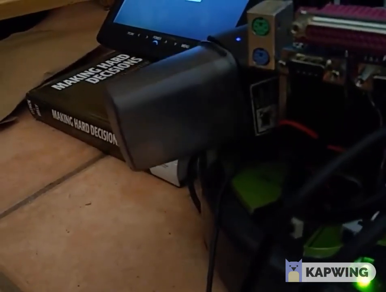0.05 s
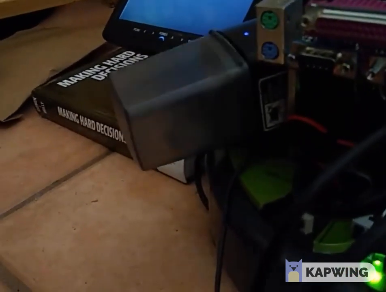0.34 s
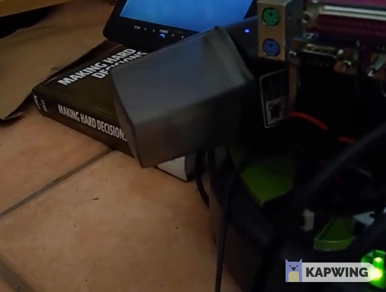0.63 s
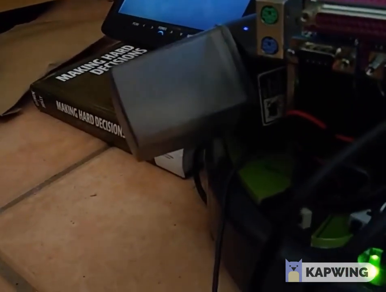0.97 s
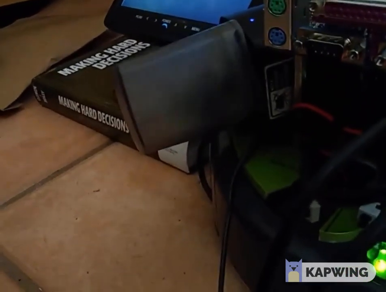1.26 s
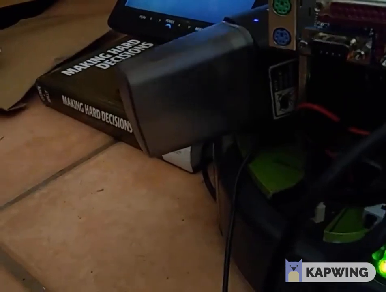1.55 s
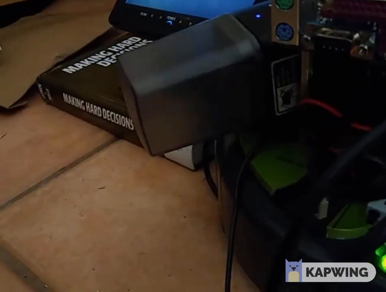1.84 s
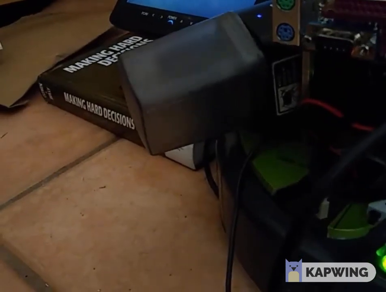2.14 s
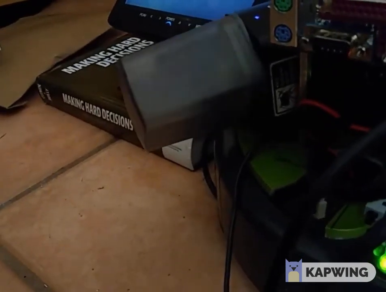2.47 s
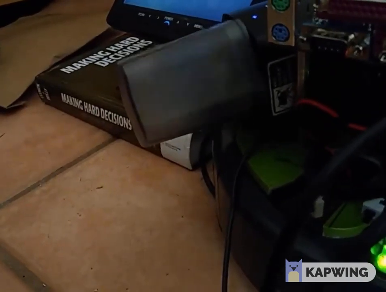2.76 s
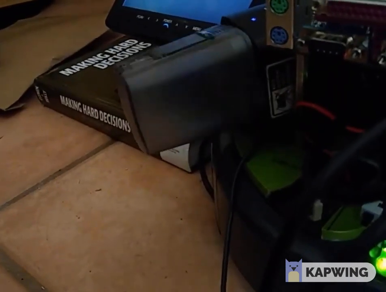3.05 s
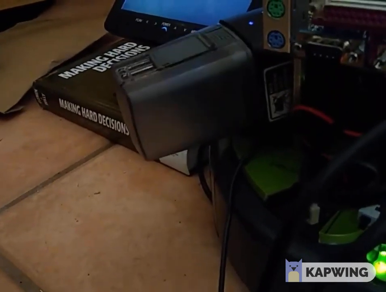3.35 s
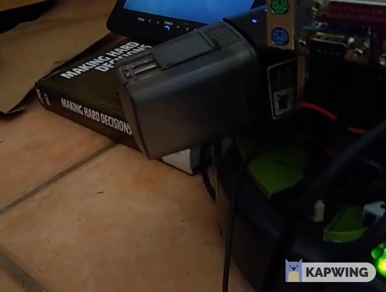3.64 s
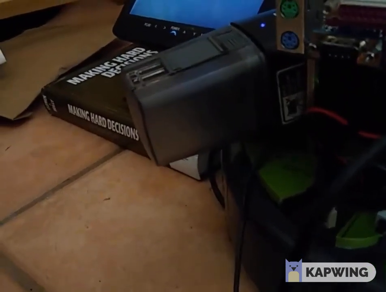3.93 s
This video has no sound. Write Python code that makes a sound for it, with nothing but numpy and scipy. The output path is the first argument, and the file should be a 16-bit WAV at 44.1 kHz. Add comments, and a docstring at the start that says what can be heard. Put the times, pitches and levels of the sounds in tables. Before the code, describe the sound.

A small geared motor whirrs and rasps, turning a plastic container, then snaps and stops.

```python
"""A small geared motor turns a plastic treat container in a quiet room. From the start its gearbox
whirrs and rasps over one rough stretch of a gear four times a second, while treats tumble against
the container wall. From 1.4 to 2.6 s the load slows the motor, the gears grind harder and the
container drones. At 3.33 s plastic snaps sharply and the power cuts; the motor coasts to rest by
3.7 s under a few last rattles, leaving faint hiss and a thin whistle."""
import sys
import numpy as np
from scipy import signal
from scipy.fft import rfft, irfft
from scipy.io import wavfile

SR = 44100
rng = np.random.default_rng(int(sys.argv[2]) if len(sys.argv) > 2 else 0)


def put_to_file(sound):
    """Save the sound as 16-bit audio at rate SR, in the file named by the first command-line argument."""
    columns = np.atleast_2d(sound).T  # one column per channel
    safe = np.clip(columns, -1, 1)
    whole_steps = np.round(safe * 32767)
    wavfile.write(sys.argv[1], SR, whole_steps.astype(np.int16))


N = 176400
FILTER_SIZE = 8192
TURNS_PER_REV = 24  # motor turns per gear revolution

# Each row: time in seconds, nominal motor speed in turns per second.
MOTOR_SPEED = [(0, 95.88), (0.38, 96.8), (0.52, 95.59), (0.68, 98.09), (1.33, 98.2), (1.62, 93.68),
               (1.97, 89.34), (2.12, 92.45), (2.45, 91.66), (2.7, 96.22), (3.02, 96.83), (3.2, 98.68),
               (3.33, 100.44), (3.39, 76), (3.46, 60), (3.62, 42), (3.69, 0)]
# Each row: time in seconds, load on the drive from 0 to 1.
DRIVE_LOAD = [(1.37, 0), (1.48, 1), (2.53, 1), (2.62, .2), (3.3, 0)]
def drive():
    """Motor speed, turns made and load; the turning sags slightly once per gear revolution."""
    speed = curve(MOTOR_SPEED)
    turns = np.cumsum(speed) / SR
    sag_turns = .03 * np.sin(2 * np.pi * turns / TURNS_PER_REV)
    return speed, turns - sag_turns, np.clip(curve(DRIVE_LOAD), 0, 1)


def gearbox(speed, turns, load):
    """Gears and motor, louder with speed. Load deepens the grinding and stops the chatter."""
    full_speed_hz, db_per_decade, load_db, power_off_s = 96, 47.5, 3.5, 3.33
    grinding = amp(load_db * load) * (rasp(turns, load) + catching_teeth(turns, load))
    chatter = (1 - load) * slack_gears(turns)
    powered = np.arange(N) / SR < power_off_s
    motor = motor_whine(turns) + powered * motor_lines(turns)
    return (grinding + chatter + motor) * amp(db_per_decade * np.log10(speed / full_speed_hz + 1e-6))


# Each row: place on the gear in motor turns, relative scraping level in dB.
GEAR_ROUGHNESS = [(.3, 0.5), (3.3, -4.5), (4.6, -14), (7, -15), (9.6, -15.5), (10.4, -10), (12, -15),
                  (15.6, -13), (16.2, -8), (17.8, -5.5), (19.8, -11), (20.9, -11), (22.4, -1.5)]
# Each row: frequency in Hz, gain in dB.
RASP_SPECTRUM = [(300, -31), (900, -10), (1800, 0), (2600, 1.5), (3600, 2.5), (6000, -1.5), (9000, -0.5),
                 (15000, -7)]
def rasp(turns, load):
    """Fine scraping that swells as the rough stretch of the gear comes round."""
    level_db = np.interp(turns, *np.transpose(GEAR_ROUGHNESS), period=TURNS_PER_REV)
    flutter_db = 1.5 * wobble(70)
    scraping = ticks(rate_hz=1500) * amp(level_db + flutter_db - 34)
    return housing(scraping, RASP_SPECTRUM, load)


# Each row: place on the gear in motor turns, relative level in dB.
TOOTH_CATCHES = [(.3, 2.5), (1.27, 1), (1.55, -4.5), (2.28, 0), (3.23, 1.5), (10.05, -7.5), (16.6, -10.5),
                 (17.25, -3), (18.2, -15.5), (18.65, -12.5), (21, -3.5), (21.65, -8.5), (22.28, 3),
                 (22.6, -2), (23.6, -3.5)]
# Each row: frequency in Hz, gain in dB.
TOOTH_SPECTRUM = [(300, -43.5), (1500, -10), (3500, -8.5), (5800, 6), (8000, -8), (15000, -13.5)]
def catching_teeth(turns, load):
    """The same teeth catch on every revolution and click through the housing."""
    return amp(-12) * housing(contacts(turns, TOOTH_CATCHES, scatter_db=1.75), TOOTH_SPECTRUM, load)


# Each row: frequency in Hz, width in Hz, unloaded gain in dB, loaded gain in dB.
HOUSING_MODES = [(1410, 150, -21, -7.5), (1810, 51, -5, -11.5), (2206, 110, -12.5, -7.5),
                 (2287, 800, -9, -8), (2770, 33, -15, -7.5), (3346, 47, 4.5, -9.5), (3650, 207, -5.5, 5.5),
                 (4630, 130, -11.5, -2), (5240, 62, -8.5, -11.5), (5710, 310, -10, 3.5),
                 (5820, 170, -2.5, -14), (6187, 330, -5, -1.5), (6640, 115, 0, 4.5), (7510, 270, -3, -3)]
# Each row: frequency in Hz, gain of the broad response under the modes in dB.
HOUSING_BROADBAND = [(200, -50), (500, -17), (1000, -21), (1180, -14.5), (2400, -9.5), (4300, -9.5),
                     (7000, -10), (8000, -10.5), (8700, -20), (10500, -18.5), (11700, -28), (13500, -23),
                     (15500, -37)]
def housing(force, spectrum, load):
    """The gearbox housing rings differently when the load presses on it."""
    hz, width_hz, light_db, heavy_db = np.transpose(HOUSING_MODES)
    colour, bed = gains(spectrum), gains(HOUSING_BROADBAND)
    light, heavy = [ring(force, colour * np.hypot(resonances(zip(hz, width_hz, db)), bed))
                    for db in (light_db, heavy_db)]
    return light * (1 - load) + heavy * load


# Each row: place on the gear in motor turns, relative levels of the low and the high ring in dB.
SLACK_HITS = [(0.8015, 2.5, -10.5), (1.85, -1, -11.5), (2.45, -14, -0.5), (3.476, -9.5, 5), (6.97, -1, 1.5),
              (10, -1.5, -12), (10.24, -10.5, 2.5), (10.71, -18, -0.5), (10.97, -4, 3.5), (11.9, -8, -8.5),
              (16.12, -8, 1), (16.62, 1.5, -15.5), (17.46, -4, 1), (17.93, -2, -2.5), (19.66, -1.5, -8),
              (20.43, -7, -20), (21.3, -9, 2.5), (22.5, 3.5, -7), (23.94, 2.5, -11)]
# Each row: frequency in Hz, width in Hz, gain in dB.
SLACK_MODES = [(2499, 144, -4), (3478, 120, -3.5)]
def slack_gears(turns):
    """Two loose gears chatter, each ringing at its own pitch."""
    place, *levels_db = np.transpose(SLACK_HITS)
    chatter = np.zeros(N)
    for hit_db, (hz, width_hz, db) in zip(levels_db, SLACK_MODES):
        hits = contacts(turns, np.c_[place, hit_db], scatter_db=1.5)
        chatter += amp(db) * ring(hits, resonances([(hz, width_hz, 0)]) * low_cut(hz=2044, order=2))
    return amp(-15) * chatter


# Each row: frequency in Hz, gain in dB.
WHINE_SPECTRUM = [(250, -52.5), (740, -27), (870, -6.5), (1020, -34), (1200, -2.5), (1550, -2.5),
                  (2500, -6.5), (3400, 0), (4500, -2.5), (6400, -5.5), (7000, -3), (7550, 7), (8600, -8.5),
                  (15000, -21)]
def motor_whine(turns):
    """A dense, slightly jittery stack of harmonics of the motor speed."""
    jitter_turns = .012 * wobble(110)
    return amp(-49.5) * unit(ring(buzz(turns + jitter_turns, harmonics=160), gains(WHINE_SPECTRUM)))


# Each row: multiple of the motor speed, relative level in dB.
MOTOR_ORDERS = [(12, -63.5), (13, -70), (14, -70.5), (20, -59), (25, -68.5), (26, -57.5)]
def motor_lines(turns):
    """A few harmonics stand out, wavering in level and pitch."""
    return sum(amp(db + 3.8 * wobble(14)) * np.sin(2 * np.pi * order * (turns + .0063 * wobble(35)))
               for order, db in MOTOR_ORDERS)


# Each row: frequency in Hz, width in Hz, gain in dB.
WALL_MODES = [(308, 23, -9.5), (365, 28, -12), (445, 14, -13.5), (564.9, 10.8, 6), (610.7, 42, 2),
              (859, 64, -5)]
def container(turns, load):
    """Treats knock on the wall; under load they slide along it and the motor makes it drone."""
    high_cut = 1 / np.hypot(1, (grid() / 1200) ** 2)
    wall = resonances(WALL_MODES) * low_cut(hz=270, order=5) * high_cut
    sliding = amp(-61 + wobble(30)) * load
    treats = ring((amp(-4) * tumbles() + sliding) * rng.standard_normal(N), wall)
    drone = amp(-61.5) * load ** 2 * unit(ring(buzz(turns, harmonics=7), wall))
    return treats + drone


# Each row: start in seconds, relative level in dB.
TREAT_LANDINGS = [(0.004, -48.5), (0.19, -52.5), (0.22, -45.5), (0.273, -60), (0.416, -58), (0.436, -51),
                  (0.464, -43), (0.507, -49.5), (0.633, -49), (0.716, -40), (0.915, -48.5), (0.947, -54.5),
                  (0.975, -45), (1.017, -51.5), (1.051, -52.5), (1.109, -48), (1.152, -50.5), (1.203, -48),
                  (1.305, -54), (1.389, -50), (1.435, -49), (1.484, -44.5), (2.148, -47.5), (2.404, -48.5),
                  (2.707, -55), (2.746, -48), (2.851, -59), (2.888, -60.5), (2.951, -56), (2.996, -58),
                  (3.069, -54.5), (3.139, -55.5), (3.246, -49.5), (3.281, -45.5), (3.559, -79)]
def tumbles():
    """Envelope of the treats landing: a soft rise and a quick fade each."""
    attack_s, t60_s = .0087, .13
    t, envelope = np.arange(SR // 2) / SR, np.zeros(N + SR)
    landing = amp(-60 * t / t60_s) * np.minimum(t / attack_s, 1)
    for start_s, db in TREAT_LANDINGS:
        envelope[round(start_s * SR):][:len(t)] += amp(db) * landing
    return envelope[:N]


# Each row: start in seconds, relative level in dB.
CLICK_HITS = [(3.2496, -29), (3.3312, -6), (3.3555, -34.5), (3.529, -31), (3.577, -38.5), (3.641, -43),
              (3.8606, -58)]
# Each row: frequency in Hz, gain in dB.
CLICK_SPECTRUM = [(180, -78), (300, -40.5), (1190, -27), (1520, -7.5), (2020, 4), (2770, 2.5), (3670, -15),
                  (5380, -0.5), (9290, -3), (11700, -14.5), (15000, -16.5), (15800, -35)]
def clicks():
    """Sharp clicks: the hard plastic snap at 3.33 s and a few gear teeth knocking as the motor runs down, each
    an impulse with a very short tail."""
    blows = np.zeros(N)
    for start_s, db in CLICK_HITS:
        blows[round(start_s * SR)] += amp(db)
    tails = spread(blows, t60_s=.024, channels=1)[0]
    return ring(1.2 * blows + 1.25 * tails, gains(CLICK_SPECTRUM))


# Each row: start in seconds, level in dB, length in seconds.
RATTLE_BURSTS = [(0.679, -50, 0.025), (2.943, -51, 0.018), (3.003, -48, 0.029), (3.184, -43.5, 0.041),
                 (3.458, -46, .03), (3.494, -50.5, 0.034), (3.575, -47, 0.011), (3.6, -50, 0.015),
                 (3.642, -54, 0.019)]
# Each row: frequency in Hz, gain in dB.
RATTLE_SPECTRUM = [(700, -45), (1150, -36.5), (1350, -7.5), (1600, -17), (1950, -1), (2350, 2.5),
                   (2900, -8), (3200, -3.5), (4100, -13.5), (5400, -9), (8000, -15.5), (11000, -41)]
def rattles():
    """Short bursts of dry treats skittering over the plastic."""
    attack_s, release_s = .0016, .0053
    t, envelope = np.arange(N) / SR, np.zeros(N)
    for start_s, db, length_s in RATTLE_BURSTS:
        rise = np.clip((t - start_s) / attack_s, 0, 1)
        fade = np.exp(-np.maximum(t - start_s - length_s, 0) / release_s)
        envelope += amp(db) * rise * fade
    return ring(envelope * ticks(rate_hz=830), gains(RATTLE_SPECTRUM))


# Each row: frequency in Hz, gain in dB.
HISS_SPECTRUM = [(30, -14.5), (97, -2.5), (250, -17), (5380, -14.5), (12000, -9), (15600, -43.5),
                 (22000, -120)]
def room_tone():
    """Faint hiss and a thin high whistle."""
    whistle_hz, width_hz = 13200, 110
    hiss = np.array([ring(noise, gains(HISS_SPECTRUM)) for noise in rng.standard_normal((2, N))])
    whistle = ring(rng.standard_normal(N), resonances([(whistle_hz, width_hz, 0)]) ** 2)
    return amp(-84) * hiss + amp(-75.5) * whistle


def contacts(turns, places, scatter_db):
    """One impulse per (place, dB) row in every revolution of the gear."""
    place, db = np.transpose(places)
    at_turns = TURNS_PER_REV * np.arange(turns[-1] // TURNS_PER_REV + 1)[:, None] + place
    strength = amp(db + scatter_db * rng.standard_normal(at_turns.shape))
    return np.bincount(np.searchsorted(turns, at_turns.ravel()), strength.ravel(), N + 1)[:N]


def ticks(rate_hz, scatter_db=3.5):
    """A random train of tiny contacts of uneven size, rms 1."""
    hits = rng.random(N) < rate_hz / SR
    return unit(hits * amp(scatter_db * rng.standard_normal(N)) * rng.choice([-1, 1], N))


def buzz(turns, harmonics):
    """One cycle of equal harmonics in random phase, played once per motor turn."""
    cycle = irfft(np.r_[0, np.exp(2j * np.pi * rng.random(harmonics))], 4096)
    return unit(np.interp(turns, np.arange(len(cycle)) / len(cycle), cycle, period=1))


def amp(db):
    """Decibels to gain."""
    return 10 ** (np.asarray(db) / 20)


def unit(x):
    """Scale to rms 1."""
    return x / np.sqrt(np.mean(x ** 2) + 1e-20)


def curve(rows):
    """(Seconds, value) rows to one value per sample."""
    return np.interp(np.arange(N) / SR, *np.transpose(rows))


def wobble(rate_hz):
    """A random curve with rate_hz knots a second."""
    knots = rng.standard_normal(int(N * rate_hz / SR) + 2)
    return np.interp(np.arange(N) * rate_hz / SR, np.arange(len(knots)), knots)


def grid():
    """Filter frequencies in Hz."""
    return np.fft.rfftfreq(FILTER_SIZE, 1 / SR)


def gains(spectrum):
    """Gain through (Hz, dB) points on a log frequency axis."""
    hz, db = np.transpose(spectrum)
    return amp(np.interp(np.log(grid() + 1), np.log(hz + 1), db))


def low_cut(hz, order):
    """Gain of a high-pass filter."""
    return 1 / np.hypot(1, (hz / (grid() + 1)) ** order)


def resonances(modes):
    """Gain of (Hz, width in Hz, dB) modes, summed in power."""
    f = grid()
    return np.sqrt(sum((amp(db) * f * width) ** 2 / ((hz * hz - f * f) ** 2 + (f * width) ** 2)
                       for hz, width, db in modes))


def ring(x, gain):
    """Apply a minimum-phase filter of unit energy, shaped like gain."""
    cepstrum = irfft(np.log(np.maximum(unit(gain), 1e-6)))
    cepstrum[1:FILTER_SIZE // 2] *= 2
    cepstrum[FILTER_SIZE // 2 + 1:] = 0
    return signal.oaconvolve(x, irfft(np.exp(rfft(cepstrum))))[:N]


def filtered(pair, response):
    """Apply a frequency response to each channel."""
    taps = np.fft.fftshift(irfft(np.atleast_2d(response)), axes=1)
    return signal.oaconvolve(pair, taps, axes=1)[:, FILTER_SIZE // 2:][:, :N]


def spread(x, t60_s, channels=2):
    """Smear x with a dying noise tail of unit energy in each channel."""
    t = np.arange(SR // 2) / SR
    tail = rng.standard_normal((channels, len(t))) * amp(-60 * t / t60_s)
    tail /= np.linalg.norm(tail, axis=1, keepdims=True)
    return signal.fftconvolve(x[None], tail, axes=1)[:, :N]


# Each row: frequency in Hz, left minus right level in dB.
STEREO_BALANCE = [(100, -4.5), (350, -2.5), (600, 3.5), (1300, -1.5), (2400, -5.5), (4400, -2.5),
                  (8000, -6.5), (15000, -2.5)]
def scene():
    """The feeder stands close by in a quiet room, a little louder on the right."""
    speed, turns, load = drive()
    gears = gearbox(speed, turns, load)
    direct = amp(-6) * gears + container(turns, load) + rattles() + clicks()
    # A short, bright diffuse tail widens the gear noise above about 2 kHz.
    bright_tail = amp(-6.5) * filtered(spread(gears, t60_s=.034), low_cut(hz=1930, order=4))
    reverb = amp(-8.5) * spread(direct, t60_s=.25)
    side, left_lead_s = np.array([[.5], [-.5]]), 5 / SR
    placing = gains(STEREO_BALANCE) ** side * np.exp(2j * np.pi * grid() * side * left_lead_s)
    return filtered(direct + bright_tail + reverb, placing) + room_tone()


def record(dry):
    """Low-pass at 15750 Hz."""
    return filtered(dry, grid() < 15750)


dry = scene()
out = record(dry)
put_to_file(out)
```